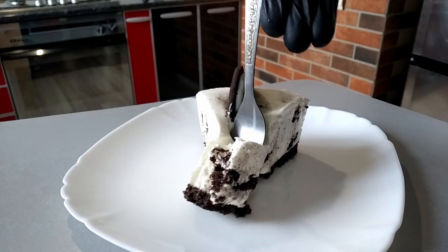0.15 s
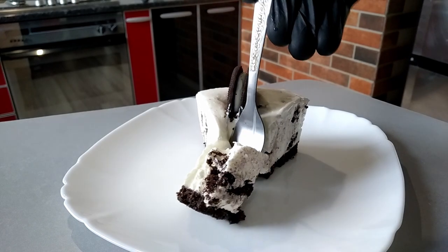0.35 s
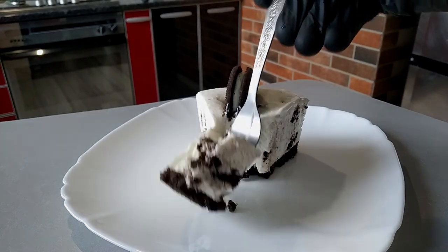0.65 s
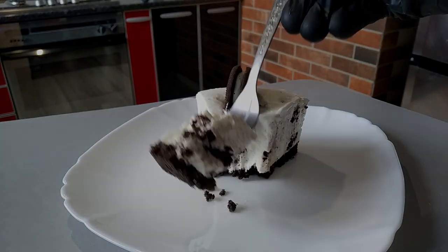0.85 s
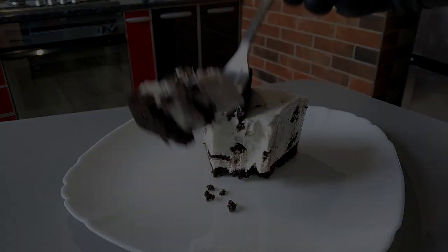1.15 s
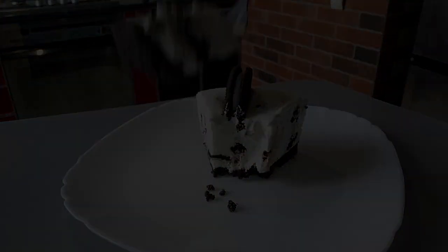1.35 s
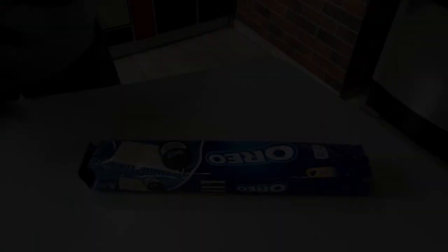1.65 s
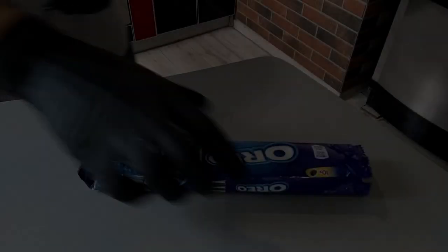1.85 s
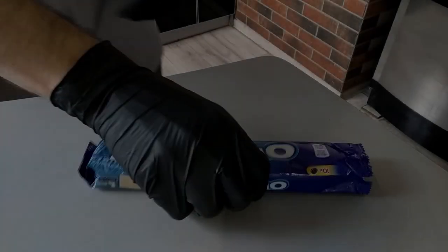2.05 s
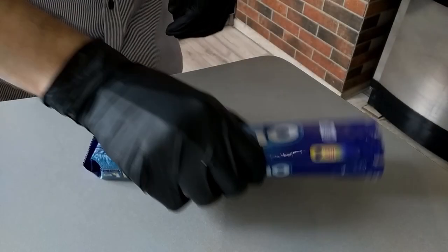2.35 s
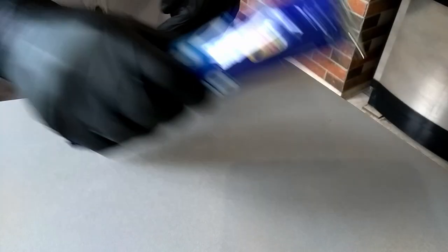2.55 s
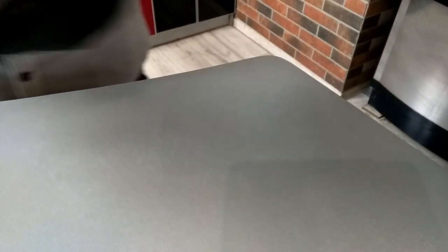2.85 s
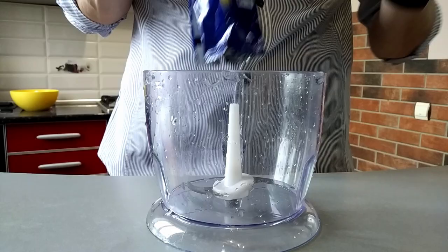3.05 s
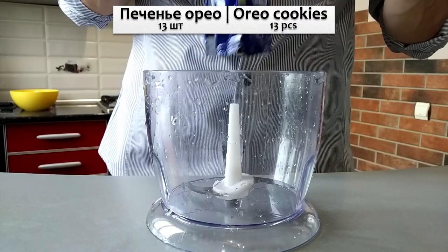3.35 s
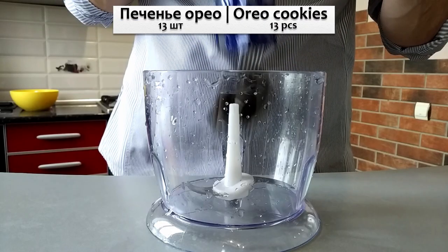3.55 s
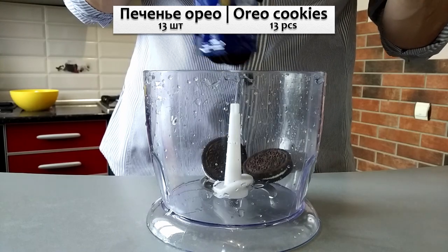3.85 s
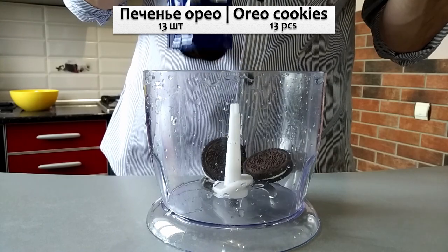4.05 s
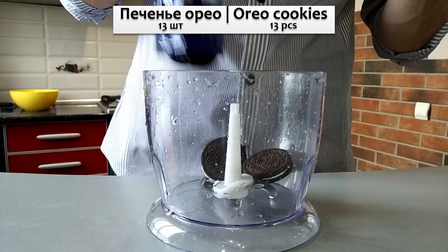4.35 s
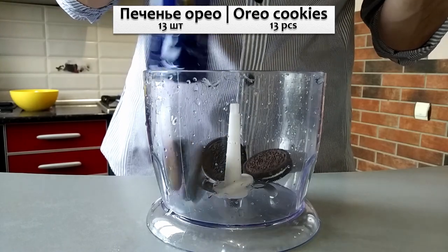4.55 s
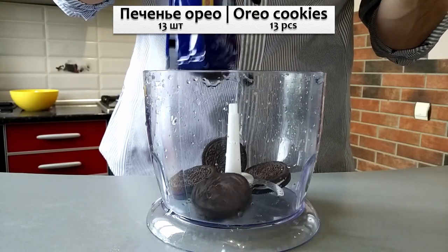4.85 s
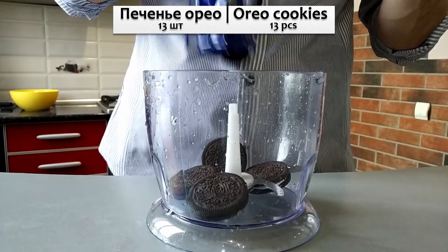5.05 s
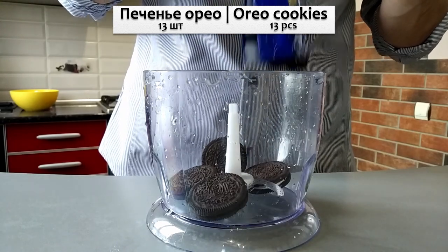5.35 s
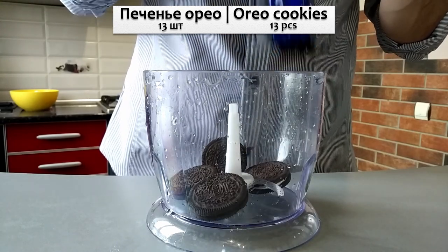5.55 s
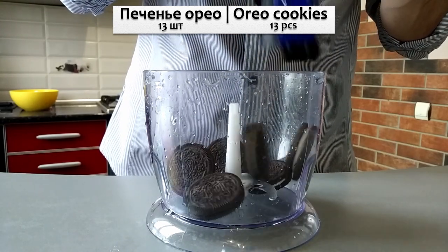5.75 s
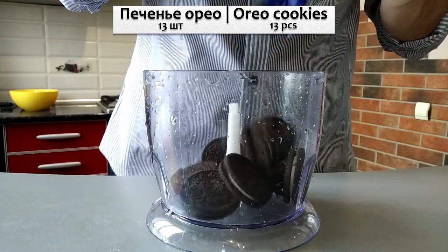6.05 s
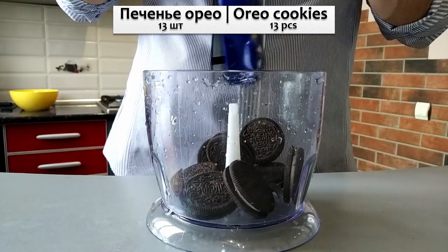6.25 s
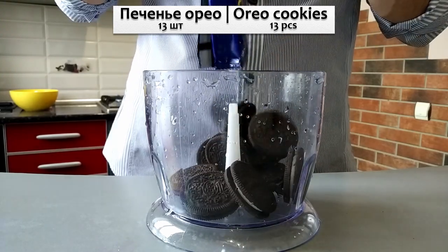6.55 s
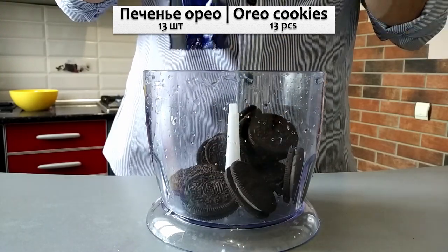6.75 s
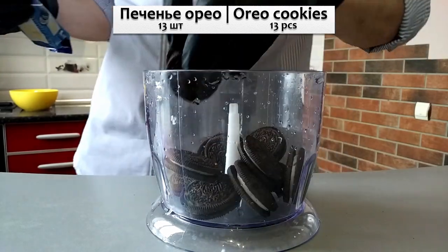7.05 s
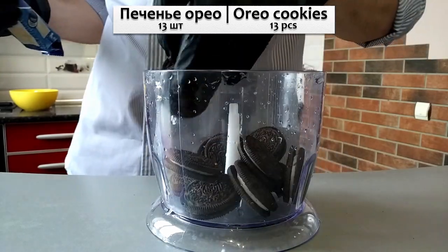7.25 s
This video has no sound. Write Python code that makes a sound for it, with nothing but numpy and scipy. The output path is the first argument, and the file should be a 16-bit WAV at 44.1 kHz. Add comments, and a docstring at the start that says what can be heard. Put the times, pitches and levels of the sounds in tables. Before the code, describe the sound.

After faint fork ticks, cookies are pushed from a crackling foil packet and clatter into a plastic chopper bowl in several bunches.

```python
"""A fork ticks faintly in a cake in a small kitchen, then a gloved hand picks up a packet of cookies.
The foil wrapper snaps and rustles as the cookies are pushed out a few at a time.
They thud, clack and rattle into the plastic bowl of a food chopper, which rings under each blow;
its motor stays off. Behind it all lie room air, a soft hiss and, at first, a faint appliance hum."""
import sys
import numpy as np
from scipy import signal
from scipy.fft import rfft, irfft
from scipy.io import wavfile
from scipy.ndimage import uniform_filter1d

SR = 44100
rng = np.random.default_rng(int(sys.argv[2]) if len(sys.argv) > 2 else 0)


def wav_out(sig):
    """Save sig, one row per channel (or a flat mono array), as 16-bit PCM at SR to the path in sys.argv[1]."""
    wavfile.write(sys.argv[1], SR, np.round(np.clip(np.atleast_2d(sig).T, -1, 1) * 32767).astype(np.int16))


N = 327222
TIME = np.arange(N) / SR

# cookies landing in the bowl: t/s, thud level/dB, thud f/Hz, crack level/dB, clack f/Hz
LANDINGS = [(3.549, -17.5, 320, -16, 2260), (3.6226, -9.5, 675, -4, 2795), (3.7037, -14, 690, -5.5, 5940),
            (3.744, -16.5, 600, -10.5, 2650), (3.784, -31, 450, -12, 2780), (4.395, -27, 400, -27.5, 2440),
            (4.45, -23.5, 634, -39, 2400), (4.533, -15, 610, -8, 2590), (4.5475, -13, 680, -16.5, 3510),
            (4.567, -15, 720, -14, 3560), (4.621, -16, 696, -7.5, 5350), (4.697, -15.5, 470, -7.5, 2364),
            (4.7339, -13.5, 760, -10.5, 2415), (4.778, -22, 550, -22.5, 2490),
            (4.886, -26.5, 633, -33, 2310), (4.964, -29.5, 660, -43, 2400), (5.027, -31.5, 660, -26, 3330),
            (5.175, -29.5, 476, -21.5, 5900), (5.450, -17, 300, -12.5, 4880),
            (5.666, -21.5, 287, -18, 2350), (5.7208, -6, 528, -4, 1740), (5.806, -19, 330, -18, 2410),
            (5.845, -13, 540, -18, 2470), (5.886, -19, 400, -10.5, 2934), (5.944, -21, 420, -21, 2620),
            (5.9697, -6.5, 535, -11.5, 2800), (6.041, -12.5, 640, -14.5, 7660),
            (6.076, -14, 388, -14.5, 1650), (6.0875, -15.5, 640, -6.5, 3860),
            (6.094, -26.5, 300, -13, 2116), (6.341, -12.5, 280, -24, 2470),
            (6.3734, -15.5, 430, -17.5, 2710), (6.536, -27.5, 624, -41, 1230), (6.571, -24, 720, -36, 1080),
            (7.394, -27.5, 516, -28.5, 3430), (7.405, -21.5, 282, -15, 3120)]
# tone of a cookie cracking or scraping: f/Hz, level/dB
CRACK_TONE = [(200, -3), (900, 4.5), (1400, -2), (2600, 3), (4600, -1), (6800, 2), (10000, 3), (15500, -22)]


def cookie_landings():
    """Each cookie grazes the wall, thuds on the plastic, cracks at its rim, clacks, topples and hops."""
    graze_s, topple_s, hop_s = .005, .014, .031
    blows = np.zeros((2, N))
    bite = 1 - np.exp(-TIME[:1500] / .0012)  # the rim crushes before it stops the cookie
    for s, thud_db, thud_hz, crack_db, clack_hz in LANDINGS:
        crumble = burst(decay_s=.0018, after_db=-13, after_s=.007, width=.8)
        lowpass = signal.butter(2, min(3.5 * clack_hz, .45 * SR), fs=SR)  # dull clack, dull crack
        crack = signal.lfilter(*lowpass, coloured(bite * crumble, CRACK_TONE))
        clack = bite * facets(clack_hz, scatter=.2, t60=.024, count=6)  # low on the wall, high on a cookie
        topple_stretch, hop_stretch = .5 + rng.random(2)
        add(blows, s, thud(thud_hz, thud_db, cycles=1.25))
        add(blows, s, thud(283, thud_db - 18, cycles=1.5))  # the floor of the bowl gives
        add(blows, s, at_level(crack, crack_db - 2.5))
        add(blows, s, at_level(clack, crack_db - 7.5))
        add(blows, s + topple_s * topple_stretch, at_level(crack[::-1], crack_db - 16.5))
        add(blows, s - graze_s, at_level(crack[:, 20:], crack_db - 19.5))
        add(blows, s + hop_s * hop_stretch, thud(thud_hz, thud_db - 15, cycles=1.25))
    return blows


def cookie_rattle():
    """After a blow, crumbs and embossed faces chatter, and the pile settles in ever smaller bounces."""
    # cookies rocking and scraping: t/s, length/s, level/dB
    rattles = [(3.665, .12, -39), (4.58, .2, -39), (5.73, .23, -37), (6.33, .03, -29), (6.4, .2, -46)]
    chatter_s, settle_s = .016, .14
    chatter, settling_power = np.zeros((2, 1, N))
    for s, thud_db, _, crack_db, _ in LANDINGS:
        add(chatter, s, gain_of(crack_db - 25) * np.exp(-TIME[:SR // 2] / chatter_s))
        add(settling_power, s, (gain_of(thud_db - 32) * np.exp(-TIME[:SR] / settle_s)) ** 2)
    slips = grains(per_s=260, spread_db=3.5)
    rocking = bounces(per_s=150, low_hz=190, high_hz=540)
    scraping = evened(patchy(coloured(slips, CRACK_TONE), depth_db=9))
    rattling = strokes(rattles, taper=.48) * (rocking + scraping)
    return rattling + chatter * scraping + np.sqrt(settling_power) * rocking


def bounces(per_s, low_hz, high_hz, spots=8):
    """Small dull bounces of settling cookies, each spot of the bowl with its own pitch."""
    patter = np.zeros(N)
    for hz in np.geomspace(low_hz, high_hz, spots):
        hits = grains(per_s / spots, spread_db=2.5).mean(0)
        patter += signal.oaconvolve(hits, thud(hz, 0, cycles=.86))[:N]
    return evened(patter)


def bowl(blows):
    """The blows with the plastic bowl's answer: a hollow boom, ringing modes and a dense blur."""
    # modes of the bowl on the table: f/Hz, level/dB, t60/s
    modes = [(52, 5, .4), (85, 12, .65), (118, 10, .45), (153, 6, .45), (240, 2, .4), (291, 5, .45),
             (350, 2, .45), (425, 1, .35), (590, -3, .4), (710, 1, .5), (765, 0, .35), (2355, 3, .26),
             (2494, 4, .24), (2630, 4, .24), (2862, 2, .2), (3690, 3, .22)]
    # tone of the blur of crowded modes: f/Hz, level/dB
    blur_tone = [(50, -4.5), (140, 2), (290, 1), (420, 0), (760, 0.5), (1050, -16), (1450, -12.5),
                 (2400, -5), (3300, -12.5), (4700, -12), (6500, -10), (12000, -17.5)]
    # decay of that blur: f/Hz, t60/s
    blur_decay = [(100, .42), (700, .27), (10000, .22)]
    cavity_hz, filling_db_per_s = 730, -2.2  # the air in the bowl booms less as it fills
    hollowness = gain_of(filling_db_per_s * np.maximum(TIME - LANDINGS[0][0], 0))
    cavity = hollowness * signal.lfilter(*signal.iirpeak(cavity_hz, 4.5, SR), blows + 1e-18)
    ringing = np.zeros((2, N))
    for hz, db, t60 in modes:
        resonance = signal.iirpeak(hz, hz * t60 * np.pi / np.log(1000), SR)
        # cookies land all over, so a mode takes a different share and sign of each blow
        share = 2 * np.interp(TIME * 25, np.arange(400), rng.uniform(-1, 1, 400))
        ringing += gain_of(db) * signal.lfilter(*resonance, blows * share)
    return blows + cavity + ringing + ring(blows + cavity / 2, blur_tone, blur_decay, ripple_db=8)


def bright_snaps():
    """Foil and cookies snap over a hollow knock; gives the snaps and a crackle envelope round them."""
    # sharp, bright snaps of foil creases and cracking cookies:
    # t/s, pop level/dB, pop f/Hz, hollow knock level/dB
    pops = [(2.041, -22, 7730, -22.5), (2.0829, -20.5, 8550, -22.5), (2.095, -26, 7400, -21),
            (2.108, -25, 8300, -47), (2.133, -14.5, 11800, -22.5), (2.202, -39, 4000, -22),
            (2.257, -34, 5830, -26.5), (2.279, -32, 7150, -36), (2.528, -34, 8600, -33.5),
            (2.838, -35.5, 5160, -32), (3.033, -39, 6100, -40), (3.183, -13.5, 8700, -32),
            (3.235, -15.5, 8930, -33), (3.3361, -14.5, 9030, -36), (3.606, -14, 8700, -36),
            (3.773, -14, 6800, -37.5), (3.7824, -13, 9400, -38.5), (4.113, -43.5, 3900, -29),
            (4.233, -48, 4000, -32.5), (4.248, -24.5, 10350, -28.5), (4.2924, -15, 10700, -45),
            (4.3135, -16.5, 8400, -27.5), (4.364, -14.5, 10800, -25.5), (4.418, -11, 10060, -28),
            (4.549, -3.5, 7870, -33), (4.738, -10.5, 7720, -24.5), (4.836, -26, 9200, -38),
            (4.999, -25, 7050, -30.5), (5.045, -25.5, 6200, -37), (5.164, -22.5, 8600, -28),
            (5.191, -14.5, 9430, -35.5), (5.199, -16.5, 8700, -23.5), (5.32, -15.5, 9600, -37.5),
            (5.344, -16.5, 8700, -22.5), (5.358, -19.5, 9600, -27), (5.419, -23, 7200, -26.5),
            (5.479, -13.5, 9150, -19), (5.5, -10, 9000, -26), (5.605, -10, 7600, -38.5),
            (5.642, -16.5, 9000, -35), (5.664, -6, 9700, -34.5), (5.834, -16, 8800, -14.5),
            (5.878, -7.5, 10500, -30), (6.117, -7, 9840, -27), (6.375, -4.5, 7500, -18.5),
            (6.527, -31, 3400, -21.5), (6.627, -13.5, 8530, -20)]
    hollow_hz = 1267  # the half-empty packet
    lead_s, fade_s = .002, .008
    snaps, snap_envelope = np.zeros((2, N)), np.zeros((1, N))
    for s, db, hz, hollow_db in pops:
        add(snaps, s, tick(hz, db - 5.5, spread=1.5))
        add(snaps, s, at_level(facets(hz, scatter=.15, t60=.016, count=4), db - 6.5))
        add(snaps, s, tick(hollow_hz, hollow_db - 3.5, spread=2.6))
        add(snaps, s, at_level(facets(hollow_hz, scatter=.4, t60=.012, count=6), hollow_db - 5))
        # a brief crackle surrounds each pop and dies away
        add(snap_envelope, s - lead_s, gain_of(db - 20) * np.exp(-abs(TIME[:SR // 2] - lead_s) / fade_s))
    return snaps, snap_envelope


def foil_rustle(snap_envelope):
    """The wrapper crackles under the hand and round each snap, and rasps as cookies slide past."""
    # the hand working along the packet: t/s, length/s, level/dB
    grips = [(2.04, 0.26, -47.5), (3.16, 0.15, -47), (3.3, 0.093, -38.5), (4.26, 0.17, -44.5),
             (5.165, 0.17, -52), (5.311, 0.057, -33), (5.447, 0.043, -29)]
    # tone of crackling foil: f/Hz, level/dB
    foil_tone = [(100, -20.5), (450, 8), (1200, 2.5), (2300, -1.5), (4000, 2.5), (8800, 3.5), (11000, 2.5),
                 (16000, -14.5)]
    # tone of cookies scraping along the foil: f/Hz, level/dB
    slide_tone = [(100, -13), (450, 5.5), (1200, -2.5), (2300, -5), (4800, -1), (8800, 3), (11500, -1.5),
                  (15500, -12.5)]
    crackle = evened(patchy(coloured(grains(per_s=2500, spread_db=3.5), foil_tone), depth_db=8))
    small_pops = grains(per_s=290, spread_db=.5)
    creases = evened(signal.oaconvolve(small_pops, tick(9700, 0, spread=1.28), axes=1)[:, :N])
    rubbing = patchy(coloured(grains(per_s=7500, spread_db=2.4), slide_tone), depth_db=9)
    stick_slip = gain_of(2 * evened(uniform_filter1d(rng.standard_normal(N), size=300)))
    held = crackle + gain_of(-4) * creases
    pushed = evened(stick_slip * rubbing) + gain_of(-8) * creases
    return strokes(grips, taper=.028) * held + snap_envelope * crackle + push_envelope() * pushed


def push_envelope():
    """Each slide gathers speed and ends as the cookie drops out; the emptied foil springs back."""
    # cookies squeezed through the mouth of the wrapper: t/s, length/s, level/dB
    pushes = [(3.472, 0.059, -22.5), (4.425, 0.065, -25), (5.607, 0.053, -21), (5.767, 0.021, -22.5),
              (6.289, 0.037, -16.5)]
    power = np.zeros(N)
    for s, length, db in pushes:
        surge = swell(s, length, rise_s=.015, fall_s=.0047)
        unfolding = gain_of(-15.5) * swell(s, length, rise_s=.015, fall_s=.052)
        power += gain_of(2 * db) * (surge ** 2 + unfolding ** 2)
    return np.sqrt(power)


def handling():
    """The glove brushes past, and things drag and bump on the table."""
    # glove and packet dragging: t/s, length/s, level/dB
    scuffs = [(1.992, 0.067, -43.5), (2.635, 0.11, -62.5)]
    # the glove's soft swishes: t/s, length/s, level/dB
    swishes = [(1.57, 0.17, -56.5), (2.67, 0.13, -56)]
    # bumps of the hand and the foot of the bowl: t/s, level/dB, f/Hz
    bumps = [(1.996, -31, 507), (2.65, -43, 149), (5.733, -21.5, 65), (6.091, -14, 75), (6.346, -12, 80)]
    drag = signal.lfilter(*signal.butter(2, 380, fs=SR), stereo_noise(N))
    swish = signal.lfilter(*signal.butter(2, [2800, 10000], "bandpass", fs=SR), stereo_noise(N))
    moves = strokes(scuffs, taper=.39) * evened(drag) + strokes(swishes, taper=.45) * evened(swish)
    for s, db, hz in bumps:
        add(moves, s, thud(hz, db, cycles=.54))
    return moves


def fork():
    """A fork works in the cake with a few faint ticks."""
    # touches of the fork: t/s, level/dB, centre f/Hz
    touches = [(.395, -46.5, 8100), (0.552, -45.5, 770), (0.602, -44, 212), (0.646, -46.5, 6900),
               (1.228, -52, 6060)]
    ticks = np.zeros((2, N))
    for s, db, hz in touches:
        add(ticks, s, tick(hz, db, spread=1.12))
    return ticks


def kitchen_echo(send):
    """The small room's reverb, shortest in the top treble."""
    # tone of the echo: f/Hz, level/dB
    echo_tone = [(60, -5), (300, -12), (1000, -7), (3000, -5), (8000, -6.5)]
    # decay of the echo: f/Hz, t60/s
    echo_decay = [(300, 0.6), (900, 0.65), (6000, 0.57), (14000, 0.41)]
    return ring(send, echo_tone, echo_decay, ripple_db=3)


def room_tone():
    """Steady air, a soft hiss that swells and sinks, and an appliance hum that stops early."""
    # tone of the room air: f/Hz, level/dB
    air_tone = [(20, -15.5), (52, 0.5), (120, -16.5), (350, -19.5), (700, -20.5), (1500, -29.5),
                (6000, -26.5), (10000, -23.5), (16000, -33.5)]
    # tone of the hiss: f/Hz, level/dB
    hiss_tone = [(100, 4), (1000, -7), (2500, -8), (5000, -7.5), (9200, 3.5), (12000, -8), (16000, -11)]
    # rise and fall of the hiss: t/s, level/dB
    hiss_fader = [(1.585, -96), (1.595, -53), (1.9, -55), (2.58, -59), (2.75, -53), (3.0, -55.5),
                  (3.2, -50), (4.1, -66)]
    # the faint appliance: f/Hz, level/dB
    hum_tones = [(441.4, -72.5)]
    air_db, hum_ends_s = -62, 1.59
    hiss = gain_of(np.interp(TIME, *np.transpose(hiss_fader))) * stereo_noise(N, hiss_tone)
    hum = sum(gain_of(db) * evened(np.sin(2 * np.pi * (hz * TIME + rng.random()))) for hz, db in hum_tones)
    return gain_of(air_db) * stereo_noise(N, air_tone) + hiss + hum * (TIME < hum_ends_s)


def burst(decay_s, after_db, after_s, width, size=1500):
    """A tiny fracture: a sharp spike of noise and a weaker crumble after it."""
    t = TIME[:size]
    shape = np.exp(-t / decay_s) + gain_of(after_db) * np.exp(-t / after_s)
    return shape * (rng.standard_normal(size) + width * rng.standard_normal((2, size)))


def tick(hz, db, spread):
    """A burst through one broad resonance."""
    band = np.clip([hz / spread, hz * spread], 30, .45 * SR)
    pop = burst(decay_s=.0006, after_db=-17, after_s=.005, width=1.2)
    return at_level(signal.lfilter(*signal.butter(1, band, "bandpass", fs=SR), pop), db)


def thud(hz, db, cycles):
    """A wall pushed in springs back in a few damped swings."""
    t = TIME[:3000]
    return at_level(-np.sin(2 * np.pi * hz * t) * np.exp(-hz * t / cycles), db)


def facets(hz, scatter, t60, count):
    """A few short random modes round one pitch, each with its own phase left and right."""
    t = TIME[:1500]
    pitch = np.minimum(hz * np.exp(scatter * rng.standard_normal((count, 1))), .45 * SR)
    phase = rng.random((count, 1)) + rng.random((2, count, 1)) / 2
    return np.sin(2 * np.pi * (pitch * t + phase)).sum(1) * gain_of(-60 * t / t60)


def grains(per_s, spread_db):
    """A random train of small slips of uneven size, each nearer one side."""
    size = gain_of(spread_db * np.minimum(rng.exponential(1, N), 3.5)) * (rng.random(N) < per_s / SR)
    return size * rng.standard_normal((2, N))


def stereo_noise(size, spectrum=None):
    """Diffuse noise: alike on both sides in the bass, unrelated in the treble."""
    # stereo image: f/Hz, left-right correlation
    likeness = [(130, 0.62), (650, 0.78), (1400, 0.01), (8000, 0.058)]
    hz = np.fft.rfftfreq(size, 1 / SR)
    left, unrelated = rfft(rng.standard_normal((2, size)))
    same = np.clip(read(likeness, hz), -1, 1)
    right = same * left + np.sqrt(1 - same ** 2) * unrelated
    colour = gain_of(read(spectrum, hz)) if spectrum else 1
    return evened(irfft(np.array([left, right]) * colour, size))


def ring(x, spectrum, t60s, ripple_db):
    """A diffuse tail that dies band by band; its modes crowd into peaks and leave valleys."""
    hz, t, bands = signal.stft(stereo_noise(SR), SR, nperseg=512)
    t60 = np.maximum(read(t60s, hz), .02)[:, None]
    crowding = evened(uniform_filter1d(rng.standard_normal(len(hz)), size=3))
    ripple = np.tanh(crowding) * hz / (hz + 2000)
    start_db = (read(spectrum, hz) + ripple_db * ripple)[:, None]
    equal_energy = np.sqrt(2 * np.log(1000) / (t60 * SR))
    tail = signal.istft(bands * gain_of(start_db - 60 * t / t60) * equal_energy, SR, nperseg=512)[1]
    tail *= 1 - np.exp(-TIME[:tail.shape[1]] / .00017)
    return signal.fftconvolve(x, tail, axes=1)[:, :N]


def patchy(x, depth_db):
    """Narrow resonances come and go, as when crumpled foil changes shape."""
    bands = signal.stft(x, nperseg=512, noverlap=384)[2]
    patches = uniform_filter1d(rng.standard_normal(bands.shape[1:]), size=5, axis=0)
    patches = uniform_filter1d(patches, size=12, axis=1)
    flicker = gain_of(depth_db * np.tanh(evened(patches)))
    return signal.istft(bands * flicker, nperseg=512, noverlap=384)[1][:, :N]


def coloured(x, spectrum, size=2048):
    """Minimum-phase EQ, so attacks stay sharp."""
    log_gain = np.log(gain_of(read(spectrum, abs(np.fft.fftfreq(size, 1 / SR)))))
    taps = np.fft.ifft(np.exp(np.conj(signal.hilbert(log_gain)))).real
    return signal.oaconvolve(x, taps[None, :size // 2], axes=1)[:, :x.shape[1]]


def strokes(rows, taper):
    """The envelope of a series of hand or cookie movements."""
    power = np.zeros((1, N))
    for s, length, db in rows:
        add(power, s, gain_of(2 * db) * signal.windows.tukey(int(length * SR), taper) ** 2)
    return np.sqrt(power)


def swell(s, length, rise_s, fall_s):
    """An envelope that rises up to time s, holds, and dies away."""
    depth = np.maximum(s - TIME, 0) / rise_s + np.maximum(TIME - s - length, 0) / fall_s
    return np.exp(-np.minimum(depth, 20))


def gain_of(db):
    """Decibels to amplitude."""
    return 10 ** (np.asarray(db) / 20)


def evened(x):
    """Scales to rms 1."""
    return x / np.sqrt(np.mean(x ** 2) + 1e-20)


def at_level(x, db):
    """Scales a short sound so that its energy, packed in one millisecond, has this level."""
    return gain_of(db) * evened(x) * np.sqrt(SR / 1000 / x.shape[-1])


def read(points, hz):
    """Reads a table on a log-frequency axis."""
    f, value = np.transpose(points)
    return np.interp(np.log(hz + 1), np.log(f + 1), value)


def add(mix, s, sound):
    """Adds a sound to the mix at time s."""
    part = mix[:, max(round(s * SR), 0):][:, :sound.shape[-1]]
    part += sound[..., :part.shape[1]]


def scene():
    """All sources, each with its own send to the kitchen's echo, over the room tone."""
    cookies = bowl(cookie_landings() + cookie_rattle())
    snaps, snap_envelope = bright_snaps()
    rustle = foil_rustle(snap_envelope)
    hands = handling() + fork()
    send = gain_of(2) * cookies + gain_of(-.5) * snaps + gain_of(1.5) * rustle + gain_of(5) * hands
    left, right = cookies + hands
    left = np.concatenate([np.zeros(2), left])[:N]  # sound from the table reaches the right side first
    return np.array([left, right]) + snaps + rustle + kitchen_echo(send) + room_tone()


def record(dry):
    """The microphone loses the deepest bass, rounds the highest peaks and cuts the top treble."""
    low_cut_hz, high_cut_hz, ceiling = 36, 16000, .85
    thinned = signal.sosfilt(signal.butter(3, low_cut_hz, "highpass", fs=SR, output="sos"), dry)
    rounded = thinned / (1 + (thinned / ceiling) ** 4) ** (1 / 4)
    high_cut = signal.firwin(255, high_cut_hz, window=("kaiser", 9), fs=SR)
    return signal.oaconvolve(rounded, high_cut[None], "same")


dry = scene()
out = record(dry)
wav_out(out)
```